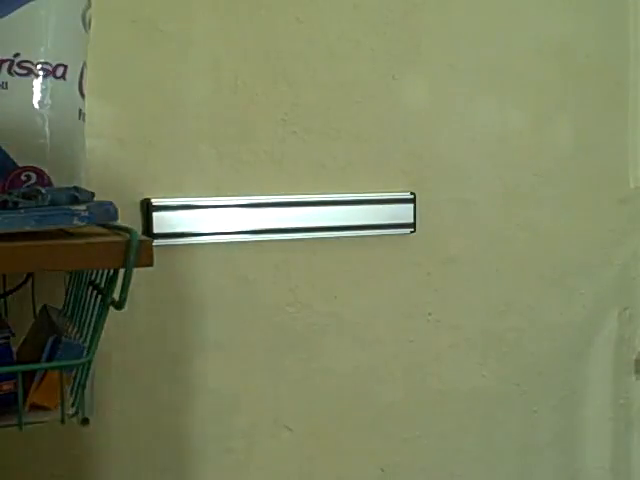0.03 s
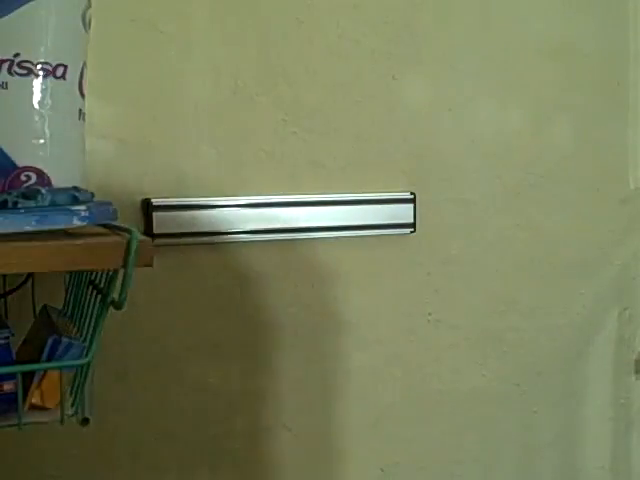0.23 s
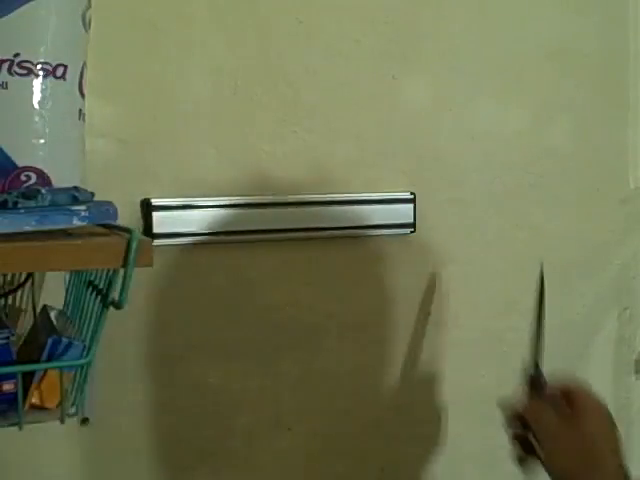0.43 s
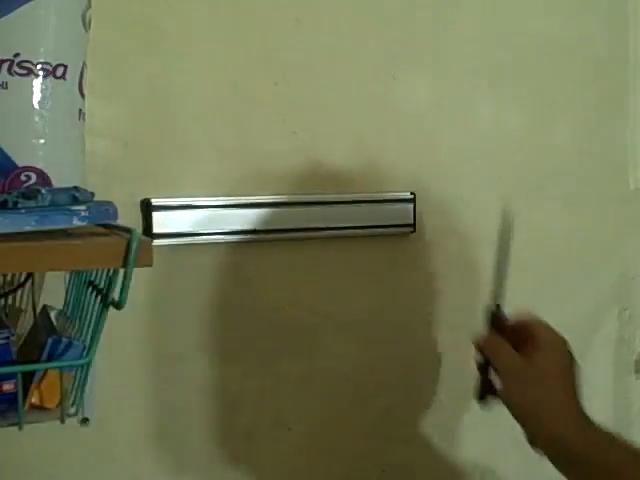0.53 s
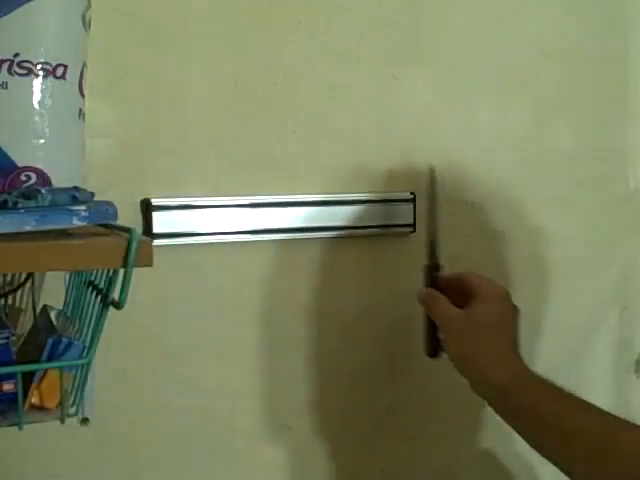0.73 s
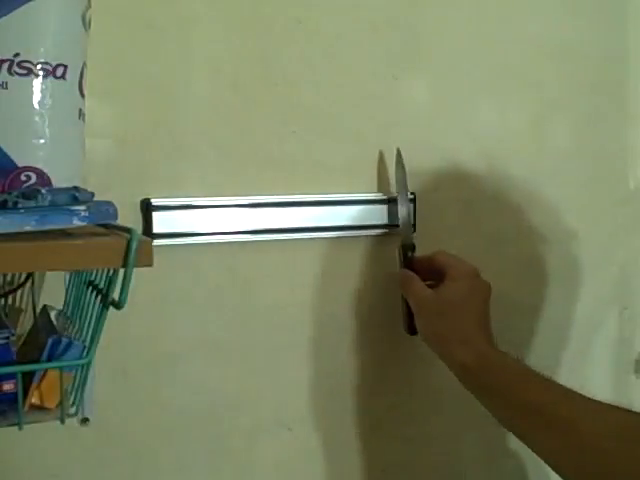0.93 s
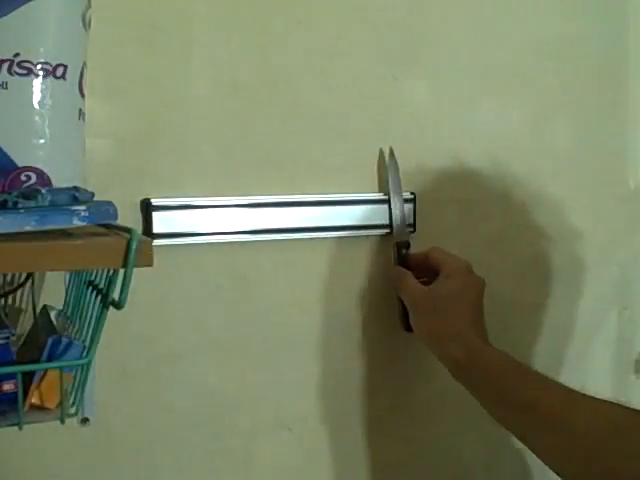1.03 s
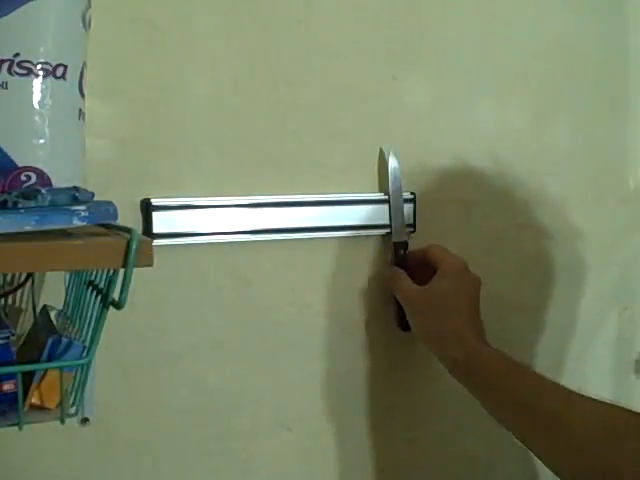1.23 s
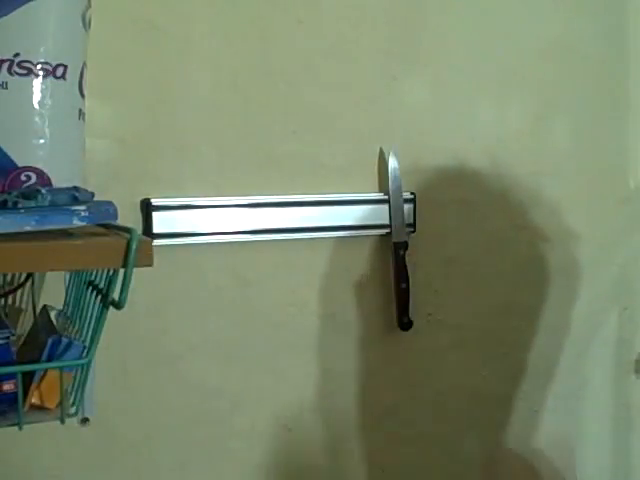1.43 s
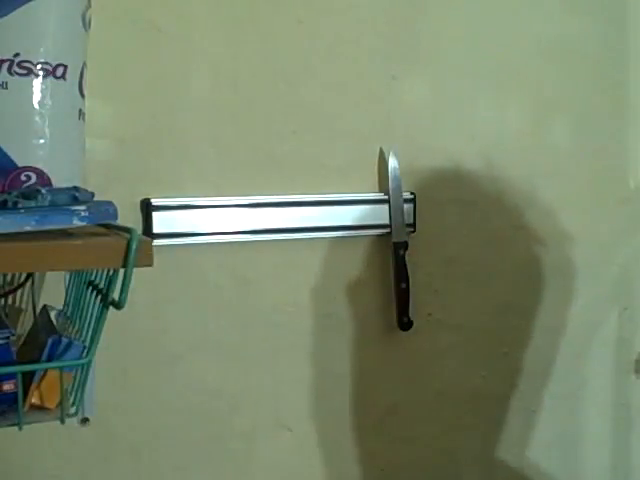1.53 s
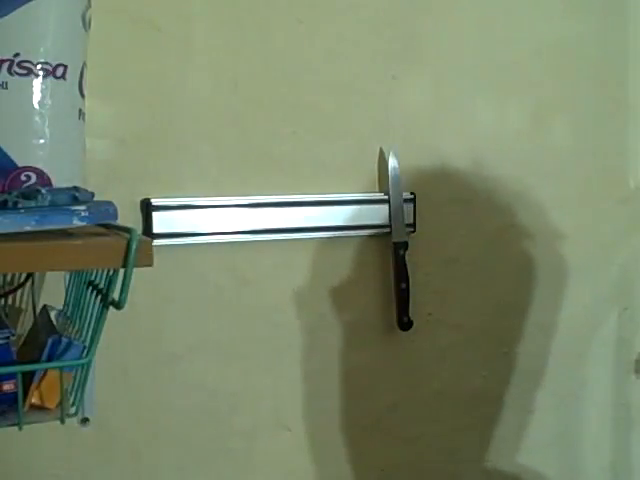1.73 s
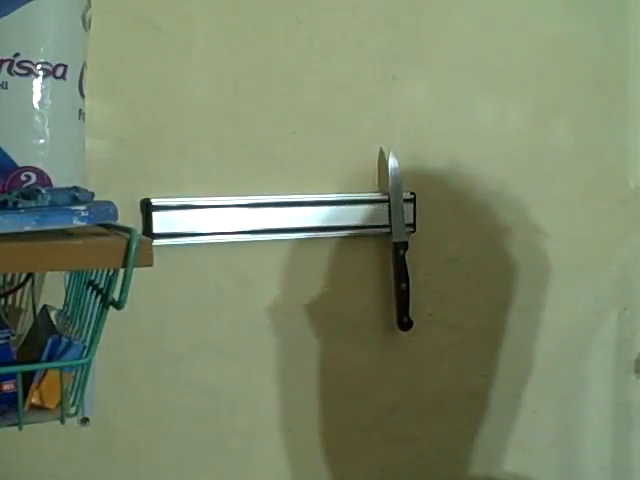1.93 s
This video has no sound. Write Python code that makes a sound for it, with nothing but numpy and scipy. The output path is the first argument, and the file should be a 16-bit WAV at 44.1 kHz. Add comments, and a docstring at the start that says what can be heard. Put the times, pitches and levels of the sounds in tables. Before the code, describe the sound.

Over steady fan hum and soft air noise, faint knocks and a sleeve rustle lead to a quick metallic click-clack as a knife grabs a magnetic strip, brightly reflected by a small kitchen, recorded in mono.

```python
"""A steel knife is pulled onto a magnetic strip on a kitchen wall: the edge touches, bounces, then the flat
snaps home. Each landing is a few tiny contacts that ring the short modes of blade and strip and crack briefly;
the small hard room answers with a dense noise tail. Behind it a fan hums as sines on its shaft orders over
coloured air noise, with another tone and a screen's thin whistle. Clothes rustle as filtered noise while
the arm moves, and faint knocks about the room are short resonant noise bursts."""
import sys
import numpy as np
from scipy import signal
from scipy.fft import rfft, irfft
from scipy.io import wavfile
from scipy.ndimage import uniform_filter1d

SR = 44100
rng = np.random.default_rng(int(sys.argv[2]) if len(sys.argv) > 2 else 0)


def dump(signal):
    """Clip the signal to [-1, 1] and save it as 16-bit WAV at the path in sys.argv[1]."""
    limited = np.clip(np.atleast_2d(signal).T, -1, 1)
    pcm = np.round(limited * 32767).astype(np.int16)
    wavfile.write(sys.argv[1], SR, pcm)


def ratio_of_db(decibels):
    """Turn decibels (scalar or array-like) into linear amplitude factors; 0 dB maps to 1."""
    return 10 ** (np.asarray(decibels, float) / 20)


N = 88200  # samples, 2 s


def unit(x):
    """Scale to rms 1."""
    return x / np.sqrt(np.mean(x ** 2))


def on_log(table, hz):
    """Read (f/Hz, value) points on a log-frequency axis."""
    points = np.array(table, float)
    return np.interp(np.log(np.maximum(hz, 1)), np.log(points[:, 0]), points[:, 1])


def coloured(table):
    """Noise shaped to the given spectrum, rms 1."""
    gain = ratio_of_db(on_log(table, np.fft.rfftfreq(N, 1 / SR)))
    return unit(irfft(rfft(rng.standard_normal(N)) * gain, N))


def walk(rate_hz):
    """Random levels, held and then smoothed twice; rms 1."""
    hold = int(SR / rate_hz)
    steps = np.repeat(rng.standard_normal(N // 40), hold)[:N]
    return unit(uniform_filter1d(uniform_filter1d(steps, hold), hold))


def fade(t, t60):
    """Exponential decay by 60 dB in t60 seconds."""
    return np.exp(-np.log(1000) * t / t60)


def octave_band(octave, k):
    """Triangular weight centred on octave k, crossfading with its neighbours."""
    return np.clip(1 - abs(octave - k), 0, 1)


def screen_whistle():
    """A screen's thin line whistle: one steady sine."""
    whine_hz, whine_db = 15625, -79  # rms level
    return np.sqrt(2) * ratio_of_db(whine_db) * np.sin(2 * np.pi * whine_hz * np.arange(N) / SR)


def air_noise():
    """Air noise: broadband noise whose level flickers slightly."""
    # spectrum of the air: (f/Hz, relative level/dB per Hz)
    air = [(20, -6.5), (60, -8), (90, -4), (130, 1.5), (300, -2), (450, -1.5), (800, -4.5), (1300, -5.5),
           (2000, -12), (3200, -18.5), (5000, -26.5), (8000, -33), (14500, -36), (15700, -30), (17000, -31)]
    level_db, flicker_db = -47.5, 0.4
    return ratio_of_db(level_db + flicker_db * walk(12.3)) * coloured(air)


def fluttering_tone(cycles, db):
    """Sine at a random phase whose level flutters around db (rms)."""
    flutter_db, flutter_hz = 2, 14.24
    level = np.sqrt(2) * ratio_of_db(db + flutter_db * walk(flutter_hz))
    return level * np.sin(2 * np.pi * (cycles + rng.random()))


def shaft_hum():
    """Multiples of the shaft rate waver together in pitch, flutter separately and swell slowly together."""
    # tones locked to the shaft: (multiple of the shaft rate)
    orders = [3, 6, 7, 8, 12, 13, 16, 20, 30, 40]
    # their rms before flutter and swell: (level/dB)
    orders_db = [-64.5, -70.5, -63.5, -47.5, -57, -77.5, -60.5, -61.5, -62.5, -76]
    # slow swell of the hum: (t/s, gain/dB)
    swell = [(0, 0), (.25, 1.5), (.5, -1), (.8, -2), (1.1, -0.5), (1.4, -0.5), (1.7, -0.5), (2, 0.5)]
    shaft_hz, waver = 41.08, 0.001034  # waver: rms fraction of the rate
    turns = np.cumsum(shaft_hz * (1 + waver * walk(3.085))) / SR
    hum = sum(fluttering_tone(k * turns, db) for k, db in zip(orders, orders_db))
    return hum * ratio_of_db(np.interp(np.arange(N) / SR, *np.array(swell, float).T))


def other_tone():
    """A tone with its own pitch waver, independent of the shaft."""
    tone_hz, tone_db = 428.5, -57.5
    cycles = np.cumsum(tone_hz * (1 + 0.0025 * walk(4.1))) / SR
    return fluttering_tone(cycles, tone_db)


def knocks():
    """Faint knocks about the room: noise through a resonance around one pitch, dying quickly."""
    # the knocks: (t/s, rms before decay/dB, f/Hz, bandwidth/Hz, t60/s)
    knock_list = [(.285, -43, 690, 500, .045), (.285, -50, 3060, 2500, 0.056),
                  (.433, -44.5, 1310, 810, 0.18), (.435, -57, 5270, 1200, 0.11),
                  (.531, -58, 5500, 3000, 0.064), (1.9955, -44, 4070, 1780, .055),
                  (1.9955, -58, 10450, 5000, .045)]
    size = 4096  # longest knock, samples
    out, t = np.zeros(N + size), np.arange(size) / SR
    for start_s, db, hz, width_hz, t60 in knock_list:
        b, a = signal.iirpeak(hz, hz / width_hz, fs=SR)
        noise = rng.standard_normal(size)
        # two passes narrow the resonance
        body = unit(signal.lfilter(b, a, signal.lfilter(b, a, noise)))
        i = int(start_s * SR)
        out[i:i + size] += ratio_of_db(db) * body * fade(t, t60)
    return out[:N]


def clothes():
    """Fine hiss of cloth that follows the arm; octave bands let the brightness change."""
    # the rustle over time: (t/s, level/dB, brightness/dB per octave around 4 kHz)
    rustle = [(0, -69.5, 6.5), (.15, -81, 9.5), (.2, -67, 5), (.28, -63.5, 5), (.34, -65, 2.5),
              (.43, -64.5, 3.5), (.5, -62, -1), (.55, -62, 0.5), (.66, -61, 2), (.7, -52, -0.5),
              (.78, -48, -2.5), (.83, -53, -1), (.88, -58, -0.5), (.98, -67, 0.5), (1.13, -67, -8),
              (1.17, -66.5, 4.5), (1.24, -64.5, -0.5), (1.5, -66, 1), (1.82, -80, 6.5), (1.88, -67, 3.5),
              (1.91, -67, 6), (1.95, -74, 5.5), (2.0, -75.5, 0)]
    # colour of the cloth: (f/Hz, relative level/dB per Hz)
    cloth = [(800, -22), (2000, -9), (3500, -1), (5500, -4), (6500, -6), (9500, -7), (13000, -10.5),
             (16500, -11)]
    times, levels, tilts = np.array(rustle, float).T
    t = np.arange(N) / SR
    db, tilt = np.interp(t, times, levels), np.interp(t, times, tilts)
    spectrum = rfft(coloured(cloth))
    octave = np.log2(np.maximum(np.fft.rfftfreq(N, 1 / SR), 1) / 4000)
    out = np.zeros(N)
    for k in range(-2, 3):
        band = irfft(spectrum * octave_band(octave, k), N)
        out += ratio_of_db(db + k * tilt) * band
    return out


def room(x):
    """Dense reflections: noise that builds up fast and dies band by band."""
    # room decay: (f/Hz, t60/s)
    decay = [(500, 0.38), (1320, 0.49), (3480, .34), (9190, 0.31), (16000, .24)]
    # colour of what the walls send back: (f/Hz, relative level/dB)
    colour = [(500, 2.3), (1600, -4.5), (2200, -0.5), (3200, 2), (4200, 2), (5200, 4.5), (6200, 1),
              (7000, 2), (8200, 1.7), (9800, 0.5), (12000, 0.7), (13200, 4), (14500, -3.5), (16000, -0.5)]
    room_db, onset_s = -6.5, 0.0032
    size = 32768
    t, hz = np.arange(size) / SR, np.fft.rfftfreq(size, 1 / SR)
    spectrum = rfft(rng.standard_normal(size)) * ratio_of_db(on_log(colour, hz))
    octave = np.log2(np.maximum(hz, 1) / 250)
    tail = np.zeros(size)
    for k in range(7):
        band = irfft(spectrum * octave_band(octave, k), size)
        tail += band * fade(t, on_log(decay, 250 * 2 ** k))
    tail = tail * (1 - np.exp(-(t / onset_s) ** 2))
    tail = tail / np.sqrt(np.sum(tail ** 2))  # unit energy
    return ratio_of_db(room_db) * signal.fftconvolve(x, tail)[:N]


def crack(noise, t):
    """The crack of a contact: a very short noise burst through a bandpass."""
    crack_db, crack_t60_s = 5, 0.0057  # gain relative to the contact
    band = signal.butter(2, [3740, 11800], "band", fs=SR, output="sos")
    return ratio_of_db(crack_db) * signal.sosfilt(band, noise * fade(t, crack_t60_s))


def mode_decay(late, hz, t60):
    """A mode rings down under the magnet's grip and flares briefly while the steel is in contact."""
    ring_cycles = 150  # the grip holds each t60 to at most this many cycles
    burst_db, burst_t60_s, burst_corner_hz = 8, 0.0026, 4420
    ring = fade(late, np.minimum(t60, ring_cycles / hz))
    burst_gain = ratio_of_db(burst_db) * np.minimum(hz / burst_corner_hz, 1) ** 2  # lower modes flare less
    return ring + burst_gain * fade(late, burst_t60_s)


def knife():
    """Every contact rings all modes with the strengths of its landing, plus a short crack."""
    # starts of touch, bounce and snap: (t/s)
    landings = [1.24, 1.265, 1.295]
    # contacts of steel on the strip: (t/s, level/dB, brightness/dB per octave around 5 kHz)
    contacts = [(1.2480, -22.5, 0.7), (1.2497, -31, -3), (1.2516, -27.5, 0.5), (1.2521, -27, 1.1),
                (1.2555, -34.5, 1.5), (1.2736, -37.5, 4.5), (1.274, -30.5, 0), (1.2756, -30, -0.5),
                (1.2777, -35, 3.5), (1.2806, -35.5, -7), (1.3034, -14, 0.36), (1.3041, -24, 4),
                (1.3075, -34, 0.5), (1.3120, -42, -.3), (1.322, -41, -8)]
    # modes of blade and strip: (f/Hz)
    mode_hz = np.array([660, 820, 960, 1350, 1620, 2190, 3380, 4330, 4750, 5130, 5300, 5930, 6180, 6330,
                        6700, 7250, 7500, 7750, 8300, 8880, 9450, 9900, 10150, 10950, 11400, 11950, 13200,
                        14500, 15400])
    # each mode: (t60/s, then relative level/dB at the touch, at the bounce, at the snap)
    rings = np.array([(0.084, -21, -39.5, -27.5), (0.028, -4, -28.5, -15), (0.028, -6, -13.5, -14.5),
                      (0.022, -11, -9, -20), (0.057, -24.5, -11, -9.5), (0.032, -6, -5, -11),
                      (0.017, -5.5, -4, -27), (0.0088, -12.5, -9.5, -17.5), (.013, -12, -16, -11.5),
                      (0.0098, -3, -15.5, -5), (0.0063, -5, -4, -9), (0.019, -22, -12, -5.5),
                      (0.018, -17, -14, 1.5), (0.014, -15, -10, 2), (.016, -6, -3, -11.5),
                      (0.011, -3, -20, -21), (0.012, -7.5, -4.5, -5.5), (0.016, -28, -18.5, -12.5),
                      (0.0164, -6, -3.5, -21), (0.0099, -2.5, -25.5, -25.5), (0.015, -10, -11.5, -4),
                      (0.0089, -8.5, -9, -20), (0.013, -17.5, -10, -18.5), (0.011, -11, -21, -29),
                      (.013, -17, -2.5, -12.5), (0.013, -8, -12.5, -15.5), (0.0098, -9, -9.5, -23.5),
                      (.013, -7, -12, -9), (.011, -12, -15.5, -16.5)], float)
    scatter_db, detune = 1.5, 0.004  # chance spread per contact, in level and as a fraction of pitch
    size, modes = 4096, len(rings)
    out, t = np.zeros(N), np.arange(size) / SR
    sign = (-1.0) ** np.arange(modes)  # neighbouring modes start in opposite polarity
    octave = np.log2(mode_hz / 5000)
    for start_s, db, tilt in contacts:
        i = int(start_s * SR)
        late = np.maximum(t - (start_s - i / SR), 0)  # time since the contact, finer than a sample
        landing = np.searchsorted(landings, start_s)  # also the column of rings
        mode_db = rings[:, landing] + tilt * octave + scatter_db * rng.standard_normal(modes)
        gain = sign * ratio_of_db(mode_db)
        hz = (mode_hz * (1 + detune * rng.standard_normal(modes)))[:, None]
        ringing = np.sin(2 * np.pi * hz * late) * mode_decay(late, hz, rings[:, :1])
        hit = gain @ ringing + crack(rng.standard_normal(size), t)
        out[i:i + size] += ratio_of_db(db) * hit
    return out


def scene():
    """Knife with its room, over fan, other tone, whistle, clothes and knocks; one channel."""
    hits = knife()
    fan = shaft_hum() + air_noise()
    background = fan + other_tone() + screen_whistle() + clothes() + knocks()
    return (hits + room(hits) + background)[None]


def roll_off(x):
    """The treble ends steeply here."""
    return signal.sosfilt(signal.butter(12, 16960, fs=SR, output="sos"), x)


def record(dry):
    """A steep elliptic lowpass cuts the top of the mix."""
    top_hz = 15730
    lowpass = signal.ellip(14, 0.5, 50, top_hz, fs=SR, output="sos")  # ripple and stopband in dB
    mix = signal.sosfilt(lowpass, dry)
    return roll_off(mix)


dry = scene()
out = record(dry)
dump(out)
```